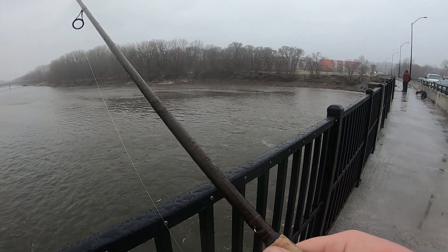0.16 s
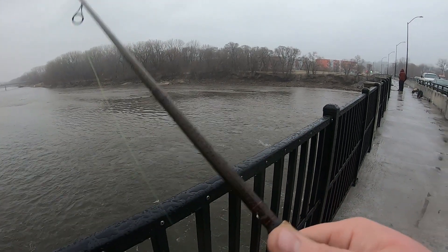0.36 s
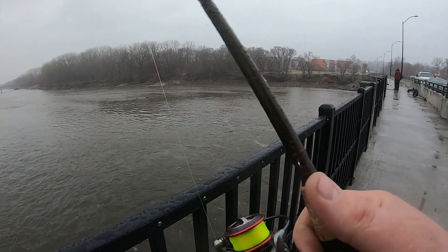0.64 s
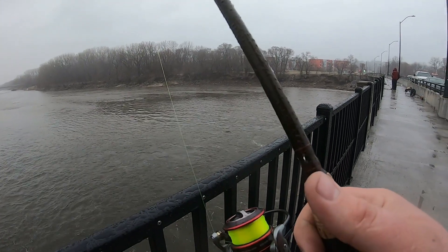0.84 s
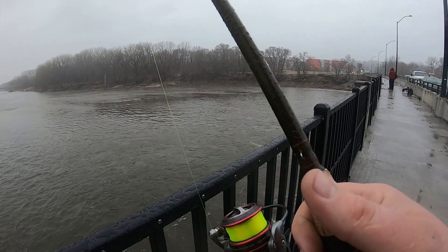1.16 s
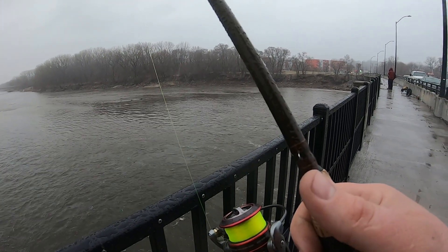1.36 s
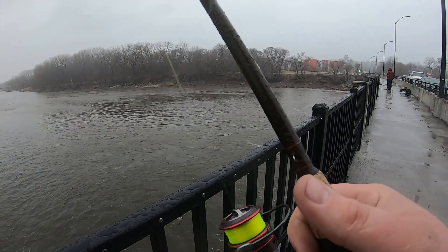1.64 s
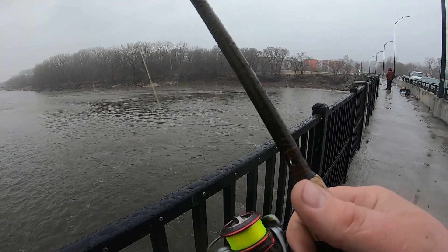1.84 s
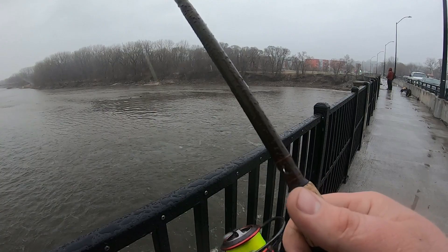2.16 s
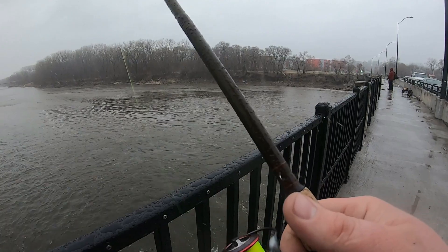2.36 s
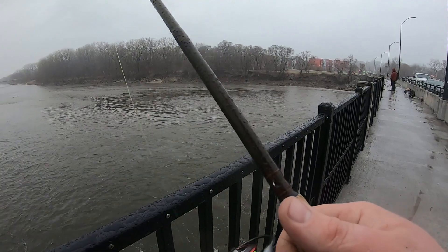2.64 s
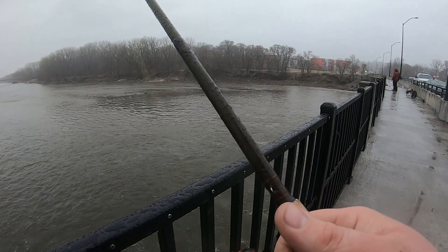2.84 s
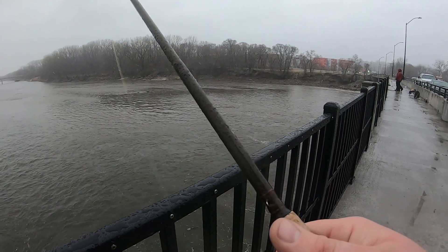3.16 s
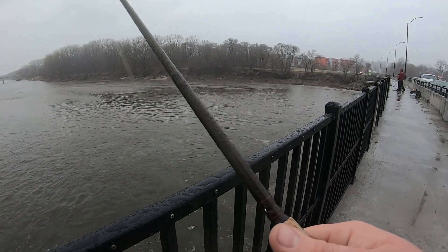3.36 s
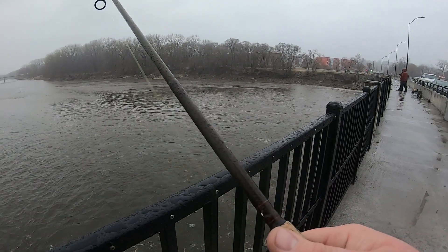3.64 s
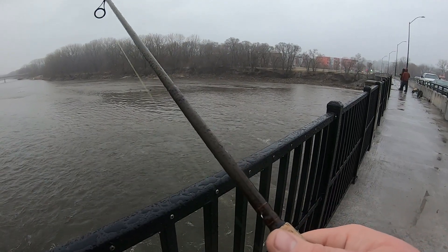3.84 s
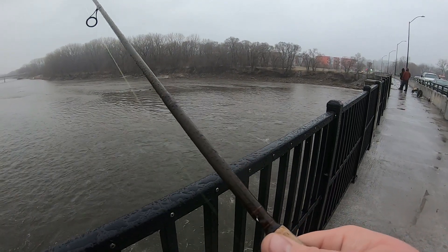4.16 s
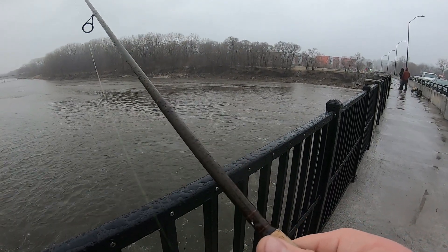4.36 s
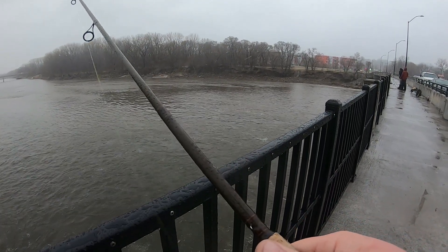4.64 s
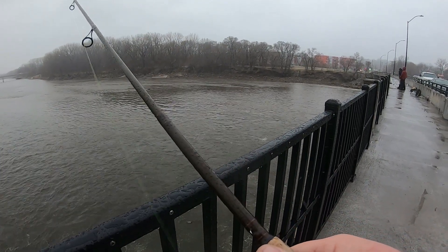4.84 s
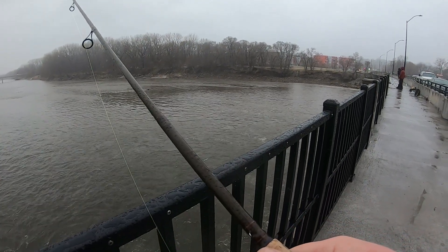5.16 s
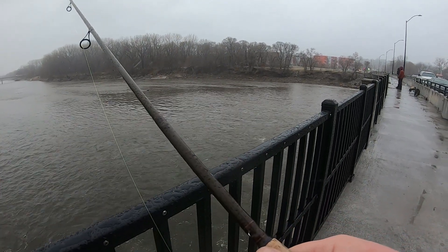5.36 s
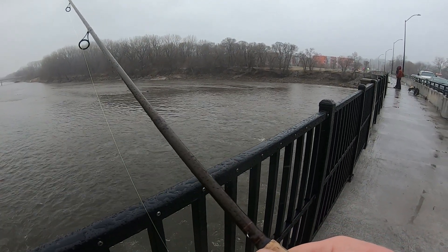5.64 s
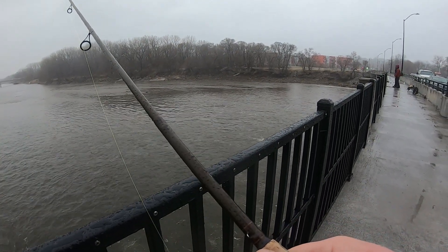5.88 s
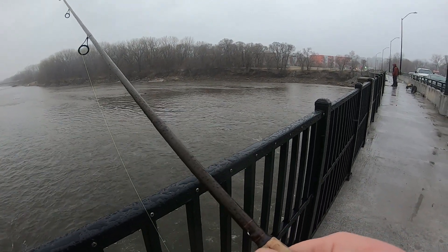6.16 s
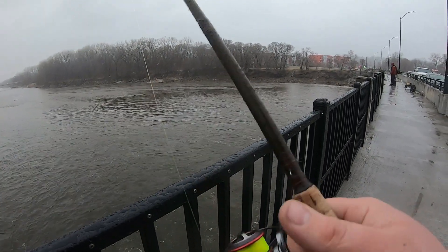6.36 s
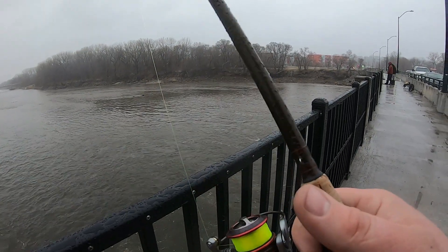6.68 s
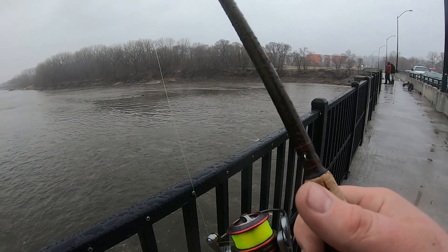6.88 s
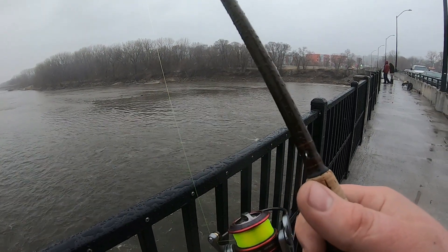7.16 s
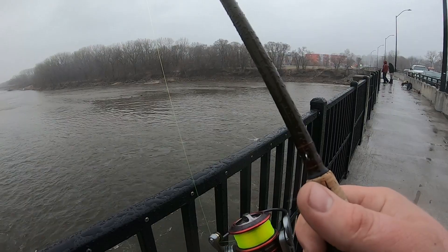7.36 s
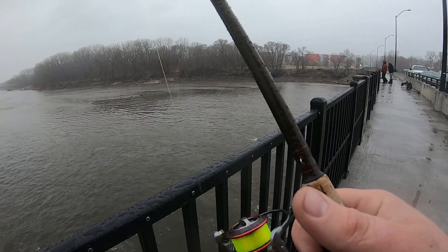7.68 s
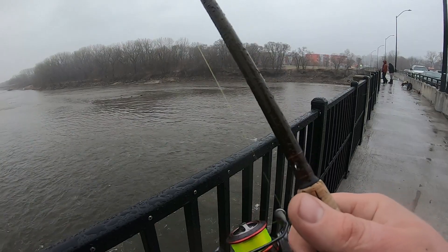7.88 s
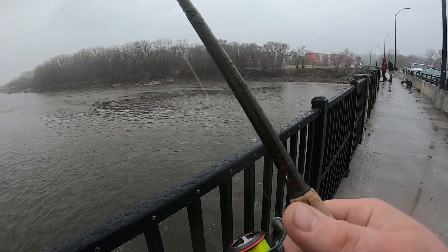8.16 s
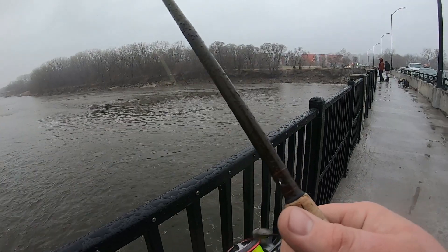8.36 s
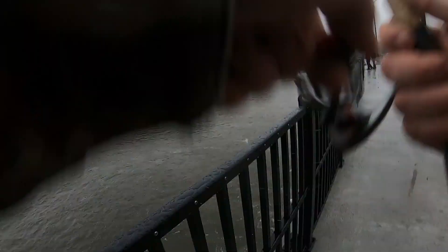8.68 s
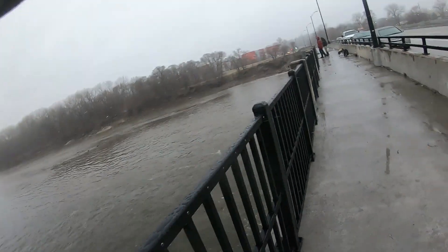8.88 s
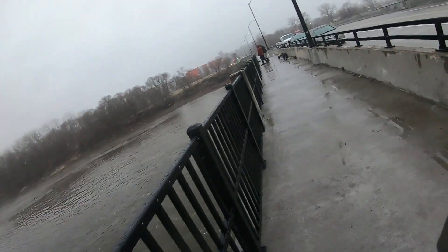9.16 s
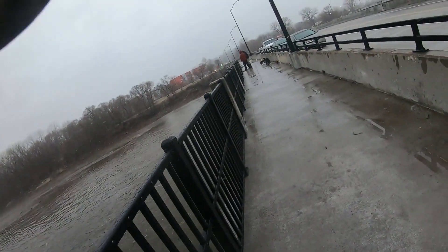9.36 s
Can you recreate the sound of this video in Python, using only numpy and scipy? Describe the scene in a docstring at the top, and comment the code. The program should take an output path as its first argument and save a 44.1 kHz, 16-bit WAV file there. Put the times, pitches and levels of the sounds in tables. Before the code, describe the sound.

Wind buffets a body-worn microphone on a bridge, with a low fluttering rumble over an even roar of wind and distant traffic. A vehicle approaches on the wet road, its axles thumping over a deck joint and its tyre hum sinking in pitch as it passes with spray and faint splashes. A fainter vehicle follows. Near the end a jacket swishes and ticks close by.

```python
"""Winter wind on a river bridge buffets a body-worn camera, over an even roar of wind and far traffic.
A vehicle nears on the wet road with tyre rush and spray. From about 4 s its tread hum sinks in pitch;
its axles thump over a deck joint, then puddles splash. A fainter vehicle follows near 8 s.
Near 9 s the wearer turns: a jacket swishes and ticks, and the body shades the roar's treble."""
import sys
import numpy as np
from scipy import signal
from scipy.fft import rfft, irfft, next_fast_len
from scipy.io import wavfile
from scipy.ndimage import uniform_filter1d, map_coordinates

SR = 44100
rng = np.random.default_rng(int(sys.argv[2]) if len(sys.argv) > 2 else 0)


def unload_wav(signal):
    """Save mono or channel-first audio to the path in sys.argv[1] as 16-bit WAV at rate SR, clipped to [-1, 1]."""
    wavfile.write(
        sys.argv[1],
        SR,
        np.round(np.clip(np.atleast_2d(signal).T, -1, 1) * 32767).astype(np.int16),
    )


N = 419391
TIME = np.arange(N) / SR


def amp(db):
    """Decibels to amplitude ratio."""
    return 10 ** (np.asarray(db) / 20)


def unit(x):
    """Normalisation to rms 1."""
    return x / np.sqrt(np.mean(x ** 2) + 1e-20)


def curves(rows):
    """Linear interpolation in time of each column after the first."""
    times, *columns = np.transpose(rows)
    return [np.interp(TIME, times, column) for column in columns]


def wobble(rate):
    """Spline interpolation of random knots, rate a second."""
    knots = rng.standard_normal(int(N * rate / SR) + 4)
    return map_coordinates(knots, [TIME * rate])


def coloured(x, spectrum):
    """Spectral shaping on a log-frequency axis, to rms 1."""
    hz, db = np.transpose(spectrum)
    size = next_fast_len(N + SR)
    bins_hz = np.fft.rfftfreq(size, 1 / SR)
    gain = amp(np.interp(np.log(bins_hz + 0.18), np.log(hz + 0.058), db))
    return unit(irfft(rfft(x, size) * gain, size)[:N])


def noise(spectrum):
    """Gaussian noise of a given spectrum, rms 1."""
    return coloured(rng.standard_normal(N), spectrum)


def patchy(depth_db):
    """White noise, randomly modulated in time and frequency."""
    frames = signal.stft(rng.standard_normal(N + 512), nperseg=512)[2]
    field = uniform_filter1d(rng.standard_normal(frames.shape), size=5, axis=0)
    field = uniform_filter1d(field, size=14, axis=1)
    return signal.istft(frames * amp(depth_db * unit(field)), nperseg=512)[1][:N]


def steadied(x, share):
    """Envelope compression: part of the chance swelling is divided out."""
    envelope = uniform_filter1d(uniform_filter1d(np.abs(x), size=SR // 8), size=SR // 8)
    return unit(x / (envelope + 0.14) ** share)


def turned(t, start_s=8.92, takes_s=0.32):
    """Linear ramp of the wearer's turn, 0 to 1."""
    return np.clip((t - start_s) / takes_s, 0, 1)


# Gusts on the microphone port: (time [s], heave [dB], flutter [dB], deep rumble [dB])
GUSTS = [(0, -39, -52, -41), (.2, -38.5, -36, -42.5), (.9, -44, -46, -40.5), (1.08, -33.5, -33.5, -37),
         (1.6, -46.5, -36.5, -44), (2.1, -45, -43, -40), (2.35, -40.5, -40, -39), (2.72, -38, -36, -39),
         (2.97, -30.5, -31.5, -35), (3.45, -34.5, -36.5, -41), (4.1, -26.5, -31.5, -39),
         (4.42, -31, -35.5, -38.5), (4.58, -16, -28, -37), (4.75, -23.5, -28.5, -32.5),
         (5.02, -12, -26, -43), (5.2, -23.5, -34.5, -38), (5.6, -30, -29.5, -41), (6, -36, -37, -41.5),
         (6.22, -27.5, -33, -35), (6.6, -37, -40, -38.5), (7.15, -27.5, -38, -42.5),
         (7.75, -37, -42, -43.5), (7.96, -17, -28, -45), (8.2, -37, -29, -44), (8.42, -26, -43, -42),
         (8.6, -12.5, -35, -43), (8.76, -21, -35, -33), (9.1, -9.5, -29, -52), (9.51, -22.5, -29, -45)]
# Random level spread: (sway [dB], heave [dB], flutter [dB], deep rumble [dB], upper rumble [dB])
GUST_SPREAD = [4.2, 4, 1.1, 0.68, 0.76]
# Eddy pressure spectra, largest eddies first: (frequency [Hz], relative level [dB])
SWAY_SPECTRUM = [(.6, -17), (1.5, 1.5), (4, -4.5), (7, -5.5), (11, -27.5), (30, -120)]
HEAVE_SPECTRUM = [(4, -30), (7, -1), (11, -3.5), (16, 1.5), (22, -17), (30, -57), (57, -120)]
FLUTTER_SPECTRUM = [(14, -69), (22, -0.5), (35, -2.5), (55, -11), (80, -17.5), (150, -36.5), (400, -120)]
DEEP_SPECTRUM = [(35, -55), (60, -0.5), (80, -0.5), (110, -3), (140, -27), (300, -120)]
UPPER_SPECTRUM = [(70, -60), (110, -4.5), (130, 0), (185, -2), (230, -29), (500, -120)]

def wind_buffet():
    """Turbulent pressure: large eddies sway and heave below hearing, small ones flutter and rumble."""
    heave_db, flutter_db, deep_db = curves(GUSTS)
    sway_db = -25.5 + 0.82 * (heave_db - heave_db.mean())
    upper_db = -42 + 0.17 * (deep_db - deep_db.mean()) - 5 * turned(TIME)
    sway_swell, heave_swell, flutter_swell, deep_swell, upper_swell = (
        amp(db * wobble(rate)) for db, rate in zip(GUST_SPREAD, [3.12, 7, 10, 4, 5]))
    sway = unit(sway_swell * steadied(noise(SWAY_SPECTRUM), share=0.62))
    heave = unit(heave_swell * steadied(noise(HEAVE_SPECTRUM), share=0.9))
    push = amp(sway_db) * sway + amp(heave_db) * heave
    push /= (1 + (push / 0.55) ** 4) ** 0.25  # the largest swings flatten out
    flutter = unit(flutter_swell * steadied(noise(FLUTTER_SPECTRUM), share=0.4))
    deep = amp(deep_db) * deep_swell * noise(DEEP_SPECTRUM)
    upper = amp(upper_db) * upper_swell * noise(UPPER_SPECTRUM)
    return push + amp(flutter_db) * flutter + deep + upper


# Wind and far traffic: (frequency [Hz], relative level [dB])
ROAR_SPECTRUM = [(90, -60), (150, -26), (200, -3), (325, -3.5), (407, -4), (498, -6.5), (578, -7.5),
                 (671, -10), (799, -11), (1080, -15.5), (1350, -16), (2780, -31), (6340, -41),
                 (15600, -60.5)]

def distant_roar(shade_db=-2.2, tilt_db_per_octave=-0.7, knee_hz=500):
    """Acoustic shadow: as the body turns, it screens the roar of wind and far tyres, treble most."""
    hz, t, frames = signal.stft(coloured(patchy(depth_db=0.4), ROAR_SPECTRUM), SR, nperseg=1024)
    octaves = np.clip(np.log2(hz / knee_hz + 1e-9), 0, 2.2)[:, None]
    shadow = amp((shade_db + octaves * tilt_db_per_octave) * turned(t))
    roar = signal.istft(frames * shadow, SR, nperseg=1024)[1][:N]
    return amp(-35 + 0.35 * wobble(5)) * roar


# Tyre noise of passing traffic: (time [s], drone [dB], rush [dB])
TRAFFIC = [(0, -73, -73), (2.4, -43, -53), (3.2, -46.5, -49), (4.2, -40.5, -50.5), (4.55, -43.5, -51),
           (5.1, -37.5, -41.5), (5.4, -35, -39), (6.04, -37.5, -38), (6.14, -32.5, -37), (6.24, -38.5, -38),
           (6.45, -40.5, -42), (6.75, -43, -45), (7.25, -52, -51.5), (7.9, -49, -45), (8.3, -52, -48),
           (9.51, -58, -70)]
# Tyre spectra: (frequency [Hz], relative level [dB])
DRONE_SPECTRUM = [(300, -68), (550, -13), (720, -5), (860, -2), (1000, -7), (1300, -14.5), (3000, -80)]
RUSH_SPECTRUM = [(600, -70), (1000, -8), (1300, 1), (1750, -1), (2300, -9.5), (3200, -20), (9000, -74)]

def tyre_noise():
    """Rolling noise: one vehicle swells and fades, then a fainter one follows near 8 s."""
    drone_db, rush_db = curves(TRAFFIC)
    drone = amp(drone_db) * coloured(patchy(depth_db=1.3), DRONE_SPECTRUM)
    rush = amp(rush_db) * coloured(patchy(depth_db=0.86), RUSH_SPECTRUM)
    return drone + rush


# Water thrown by the tyres: (frequency [Hz], relative level [dB])
SPRAY_SPECTRUM = [(1500, -42), (2800, -4), (4500, 1), (5500, -4.5), (6500, -2.5), (8000, -8.5),
                  (12000, -20), (16000, -38)]
# Puddle splashes: (time [s], level [dB])
PUDDLES = [(5.169, -69), (5.31, -71), (5.71, -75), (5.78, -57), (5.96, -59), (6.13, -61), (6.22, -65)]

def spray(splash_s=0.028):
    """Amplitude modulation: the hiss of spray follows the tyre rush and surges at each puddle."""
    _, rush_db = curves(TRAFFIC)
    wet_road = amp(-60.5 + 0.6 * (rush_db + 40.5))
    splashes = sum(amp(db) * np.exp(-0.5 * ((TIME - s) / splash_s) ** 2) for s, db in PUDDLES)
    return (wet_road + splashes) * coloured(patchy(depth_db=1.8), SPRAY_SPECTRUM)


# Tread tone: (time [s], frequency [Hz], level [dB])
TREAD_TONE = [(3.9, 364, -71), (4.1, 364, -43.5), (4.6, 358, -46), (4.75, 358.4, -41), (5.3, 351.5, -35.5),
              (5.42, 345, -44), (5.62, 328, -47), (5.75, 320, -72)]

def tread_hum():
    """Frequency glide: the tread's tone swells, sinks in pitch and fades as the vehicle goes by."""
    hz, db = curves(TREAD_TONE)
    cycles = np.cumsum(hz + 1.53 * wobble(25.05)) / SR
    return np.sqrt(2) * amp(db + 1.8 * wobble(11)) * np.sin(2 * np.pi * cycles)


# Axle impacts: (time [s], level [dB], gain of modes below 500 Hz [dB])
AXLE_IMPACTS = [(4.49, -22, -6), (4.624, -26.5, -5.5), (4.679, -22, -8), (4.728, -28, 0.5)]
# Joint modes: (frequency [Hz], relative level [dB], 60 dB decay time [s])
JOINT_MODES = [(181, -3, 0.055), (245, 5, 0.081), (344, 2, 0.091), (698, 5, 0.03), (860, -9, 0.018),
               (1170, -18, .015)]
# Deck vibration: (frequency [Hz], relative level [dB])
SHUDDER_SPECTRUM = [(60, -120), (110, -30), (170, 1), (260, 4), (450, -3), (900, -7), (1500, -40),
                    (3000, -120)]

def joint_thumps(shudder_db=-13, shudder_t60_s=0.45):
    """Impact excitation: each axle rings the joint's damped modes, and the deck shudders after it."""
    ring, shudder = np.zeros(N), np.zeros(N)
    t = TIME[:SR // 3]
    ring_attack, shudder_attack = 1 - np.exp(-t / 0.0007), 1 - np.exp(-t / 0.004)
    for s, db, low_db in AXLE_IMPACTS:
        span = slice(round(s * SR), round(s * SR) + len(t))
        shudder[span] += shudder_attack * amp(db + shudder_db - 60 * t / shudder_t60_s)
        for hz, mode_db, t60 in JOINT_MODES:
            struck_db = db + mode_db + low_db * (hz < 500) + rng.normal(0, 1.1)
            ring[span] += ring_attack * amp(struck_db - 60 * t / t60) * np.sin(2 * np.pi * hz * t)
    return ring + shudder * noise(SHUDDER_SPECTRUM)


# Cloth strokes: (start [s], hold [s], level [dB], relative level of fine grains [dB])
STROKES = [(8.696, .02, -48.5, -6), (8.747, 0.064, -44.5, -9.5), (8.87, 0.13, -63, -13),
           (9.196, .005, -48, -13), (9.278, 0.065, -56, -6), (9.4, .07, -61, -8)]
# Cloth grain spectra: (frequency [Hz], relative level [dB])
FINE_SPECTRUM = [(4500, -38), (7500, -1), (10000, 1), (12500, 0), (14500, -8), (16000, -3)]
COARSE_SPECTRUM = [(700, -37), (1300, -5), (2100, -3), (2600, 0), (2900, 0.5), (3400, -6), (5200, -10),
                   (7500, -14), (11000, -36)]

def jacket_swish(rise_s=0.045, fall_db_per_s=220):
    """Friction noise: stiff cloth rubs in dense uneven grains, stroke by stroke."""
    def grains(spectrum, spread_db):
        roughness = amp(spread_db * wobble(250) + 1.7 * wobble(40))
        return coloured(roughness * patchy(depth_db=2.5), spectrum)

    fine, coarse = np.zeros(N), np.zeros(N)
    for s, hold_s, db, fine_db in STROKES:
        rise = np.clip((TIME - s) / rise_s, 0, 1) ** 2
        fall_db = fall_db_per_s * np.clip(TIME - s - rise_s - hold_s, 0, 2)
        envelope = rise * amp(db - fall_db)
        coarse += envelope
        fine += amp(fine_db) * envelope
    return fine * grains(FINE_SPECTRUM, 2.6) + coarse * grains(COARSE_SPECTRUM, 1.5)


# Crease snaps: (time [s], peak level [dB], frequency [Hz], length [cycles])
CREASES = [(8.705, -41, 5200, 4), (8.751, -46, 14500, 9), (8.786, -40, 2900, 12), (8.842, -38, 2750, 12),
           (8.894, -47, 3500, 4), (9.048, -47, 11400, 6), (9.073, -35, 10400, 6.3), (9.122, -52, 12000, 4),
           (9.252, -40, 2920, 12), (9.253, -41, 5900, 4), (9.272, -43, 2900, 11), (9.325, -33, 5900, 2.5),
           (9.371, -43, 11100, 14), (9.421, -52, 13700, 40), (9.45, -47, 8040, 3), (9.492, -41, 2900, 6),
           (9.493, -48, 11200, 3)]

def crease_ticks():
    """Transient radiation: each snapping crease of the jacket emits a brief tone burst."""
    ticks, t = np.zeros(N), TIME[:SR // 100]
    for s, db, hz, cycles in CREASES:
        age = 3 * hz * t / cycles
        envelope = (age * np.exp(1 - age)) ** 2
        snap = envelope * np.sin(2 * np.pi * hz * t + rng.uniform(0, 2 * np.pi))
        part = ticks[round(s * SR):][:len(t)]
        part += amp(db) * snap[:len(part)]
    return ticks


def scene():
    """Superposition: all sources add at the one microphone."""
    background = wind_buffet() + distant_roar()
    traffic = tyre_noise() + spray() + tread_hum() + joint_thumps()
    jacket = jacket_swish() + crease_ticks()
    return (background + traffic + jacket)[None]


def record(dry):
    """Band limiting: the camera keeps nothing above its cutoff."""
    cutoff_hz, pad = 15730, SR // 4
    padded = np.pad(dry, ((0, 0), (pad, pad)), "reflect", reflect_type="odd")
    size = next_fast_len(padded.shape[1])
    passband = np.fft.rfftfreq(size, 1 / SR) < cutoff_hz
    return irfft(rfft(padded, size) * passband, size)[:, pad:pad + N]


dry = scene()
out = record(dry)
unload_wav(out)
```